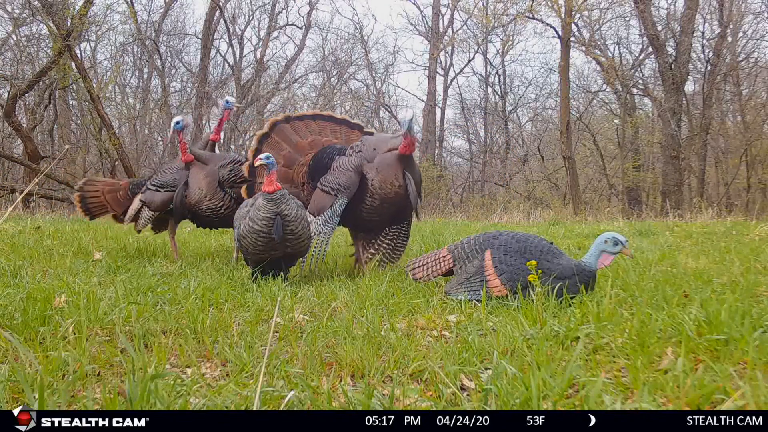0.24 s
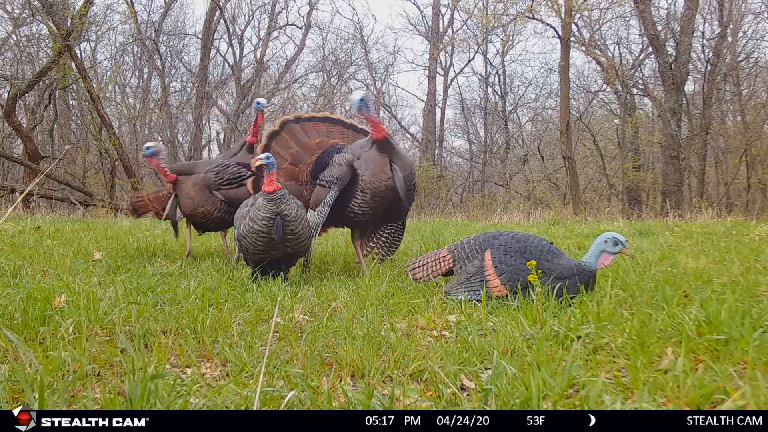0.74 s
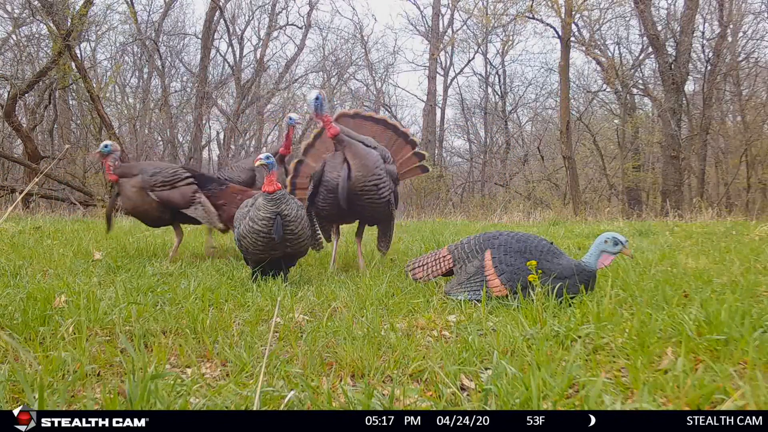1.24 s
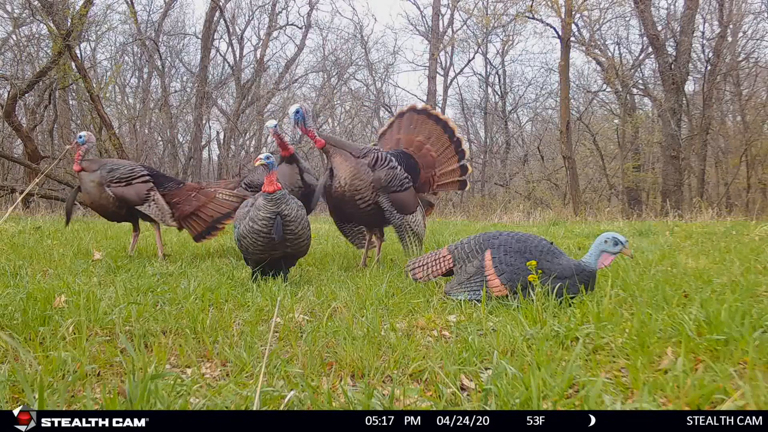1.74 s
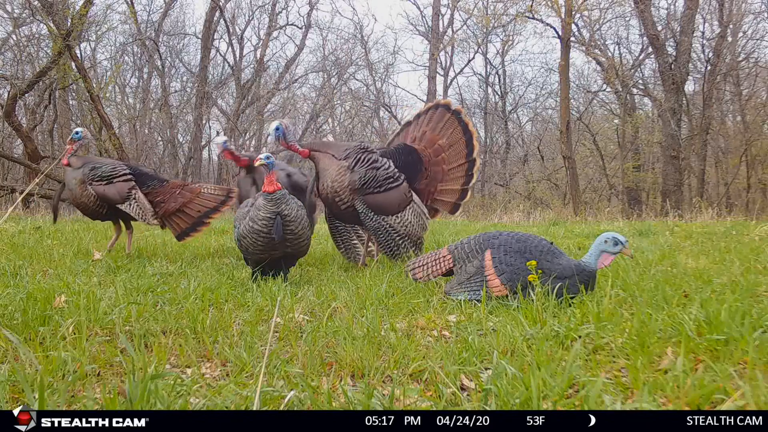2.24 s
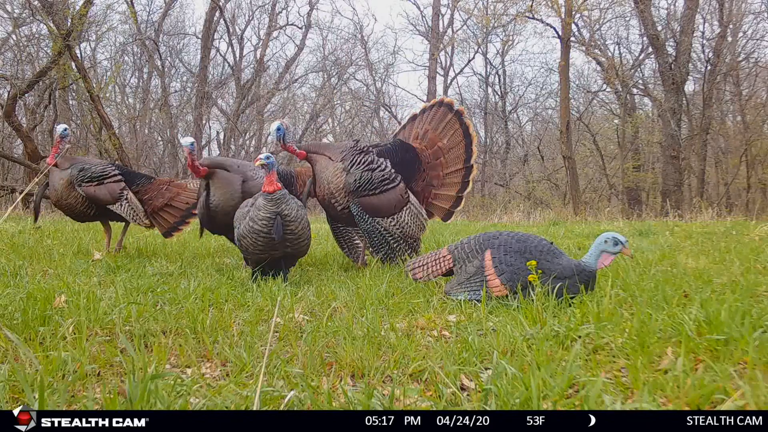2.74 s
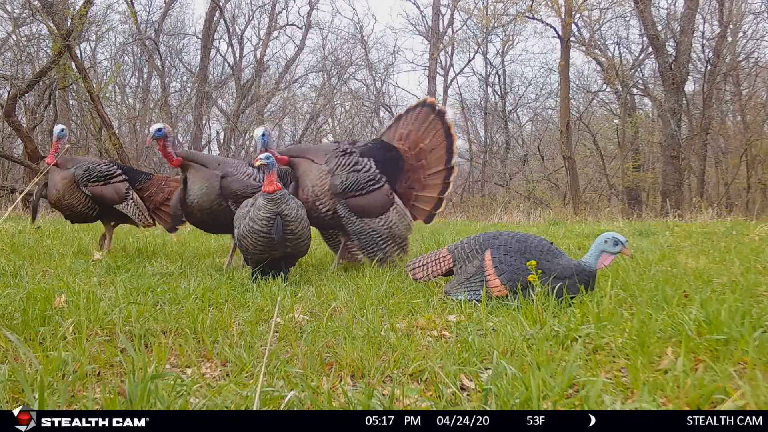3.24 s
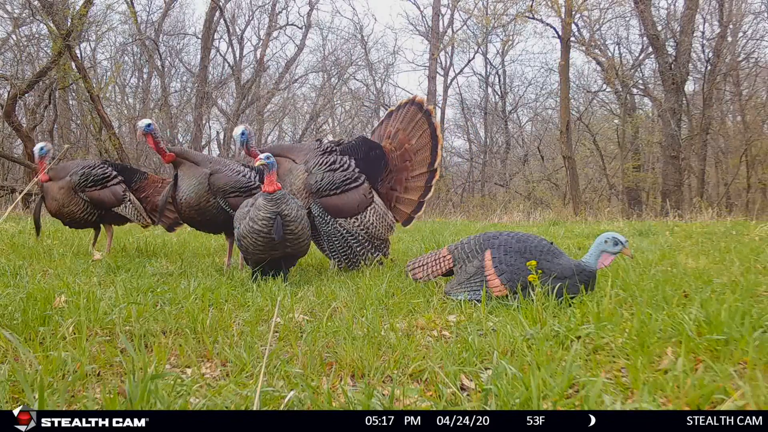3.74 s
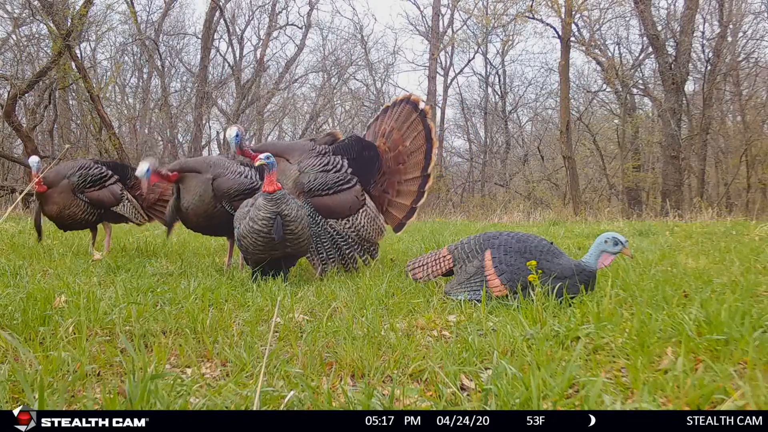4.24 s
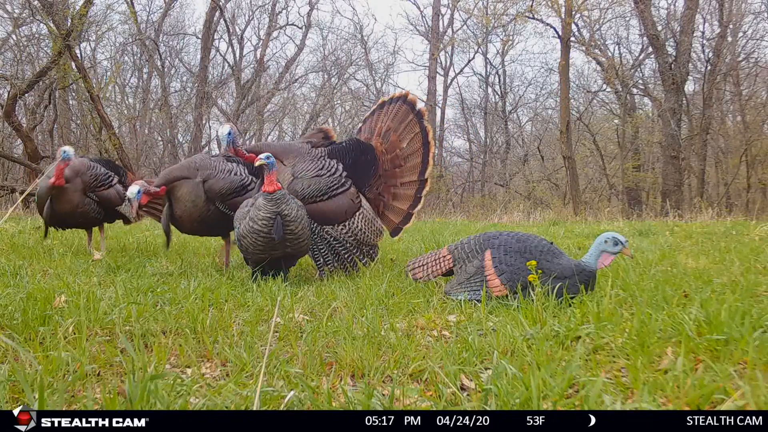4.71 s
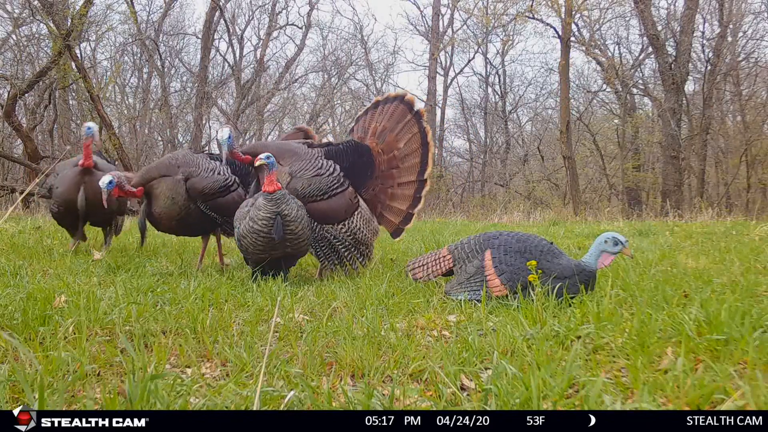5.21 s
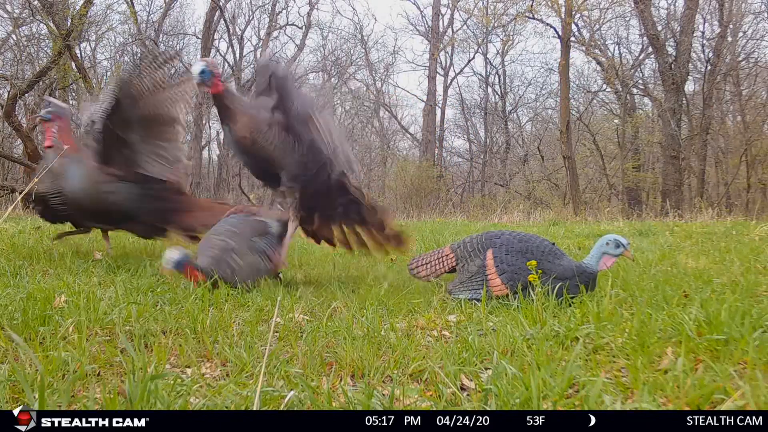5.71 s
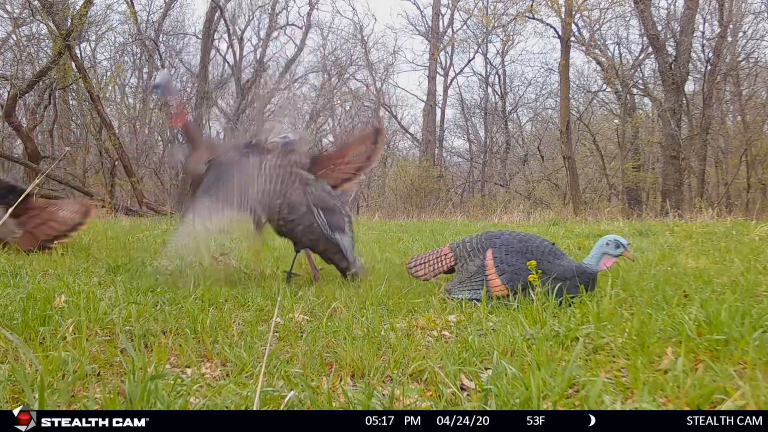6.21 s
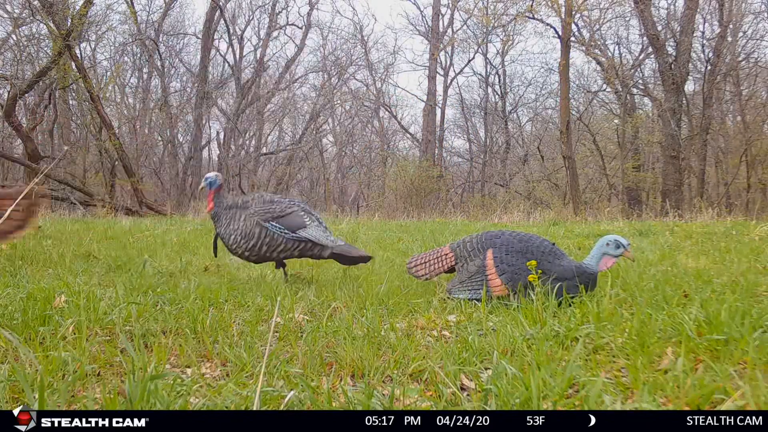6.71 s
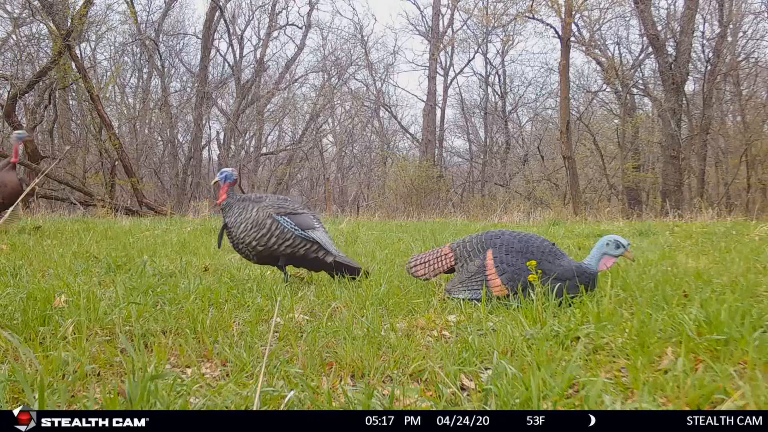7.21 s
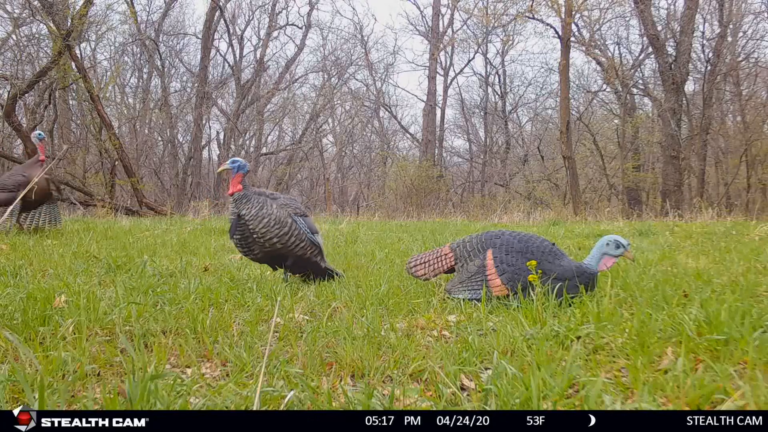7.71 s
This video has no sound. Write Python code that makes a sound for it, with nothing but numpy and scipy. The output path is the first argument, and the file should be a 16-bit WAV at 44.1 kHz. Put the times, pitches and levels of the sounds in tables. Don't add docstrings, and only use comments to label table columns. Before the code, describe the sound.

A turkey purrs in short rolling whistled notes over grass rustle, then a violent burst of wing slaps, cracking quills, hollow knocks and thumps overloads the microphone.

```python
import sys
import numpy as np
from scipy import signal
from scipy.fft import rfft, irfft, next_fast_len
from scipy.io import wavfile
from scipy.ndimage import uniform_filter1d, map_coordinates

SR = 44100
rng = np.random.default_rng(int(sys.argv[2]) if len(sys.argv) > 2 else 0)


def int16_out(signal):
    q = np.round(np.clip(np.atleast_2d(signal).T, -1, 1) * 32767)
    wavfile.write(sys.argv[1], SR, q.astype(np.int16))


def convert_level_to_amplitude(level_db):
    exponent = np.asarray(level_db, float) / 20
    return 10 ** exponent


N = 351036
SPAN = np.arange(-4096, 4096)
MS = SPAN / SR * 1000
TIME = np.arange(N) / SR


def unit(x):
    return x / np.sqrt(np.mean(x ** 2) + 1e-20)


def wobble(rate, size=N):
    knots = rng.standard_normal(int(size * rate / SR) + 4)
    return map_coordinates(knots, [np.arange(size) * rate / SR])


def filtered(x, response):
    m = next_fast_len(len(x) + 4096)
    hz = np.fft.rfftfreq(m, 1 / SR) + 1
    return irfft(rfft(x, m) * response(hz), m)[:len(x)]


def empty_track():
    return np.zeros(N + 2 * len(SPAN))


def add(track, s, piece):
    track[round(s * SR):][:len(SPAN)] += piece


def trimmed(track):
    return track[-SPAN[0]:][:N]


def crackle(size, spiky_db):
    jumps = np.repeat(rng.standard_normal(size // 16 + 1), 16)[:size]
    return rng.standard_normal(size) * convert_level_to_amplitude(spiky_db * jumps)


def rush(spectra, spiky_db, patchy_db):
    z = signal.stft(crackle(N, spiky_db), nperseg=256)[2]
    patches = uniform_filter1d(rng.standard_normal(z.shape), size=12, axis=0)
    patches = unit(uniform_filter1d(patches, size=6, axis=1))
    noise = signal.istft(z * convert_level_to_amplitude(patchy_db * patches), nperseg=256)[1][:N]

    def coloured(spectrum):
        point_hz, db = np.transpose(spectrum)
        return unit(filtered(noise, lambda hz: convert_level_to_amplitude(np.interp(np.log(hz), np.log(point_hz), db))))

    return [coloured(spectrum) for spectrum in spectra]


def bursts(rows, spiky_db):
    track = empty_track()
    for s, db, centre_hz, spread, rise, fall in rows:
        shape = convert_level_to_amplitude(db - 7.4 * np.where(MS < 0, -MS / abs(rise), MS / abs(fall)))
        bell = lambda hz: np.exp(-(np.log(hz / centre_hz) / spread) ** 2 / 4) / np.sqrt(hz)
        piece = filtered(shape * crackle(len(SPAN), spiky_db), bell)
        add(track, s, piece * np.linalg.norm(shape) / np.linalg.norm(piece))
    return trimmed(track)


# centre in Hz, width in Hz, level in dB.
THROAT = [
    (1180, 90, -12),
    (2100, 150, -32),
    (3450, 250, -35),
]


def whistles(notes, arch, reach, lag):
    track = empty_track()
    bend = (np.tanh((MS - lag) / reach) + np.tanh(lag / reach)) * reach
    broken = (1 + np.tanh(MS - lag - 1)) / 2
    for s, db, hz, glide, rise, fall, top_db in notes:
        shape = np.exp(-.9 * np.abs(MS / np.where(MS < 0, rise, fall)) ** np.where(MS < 0, 1.6, 2.8))
        break_dip_db = -5 * (lag > 0) * np.exp(-(MS - lag - .5) ** 2)
        shape *= convert_level_to_amplitude(top_db * broken + break_dip_db)
        pitch = hz + glide * bend - arch * (7 + abs(glide)) * bend ** 2
        pitch += 20 * wobble(250, size=len(SPAN))
        phase = 2 * np.pi * (np.cumsum(pitch) / SR + rng.random())
        tone = np.sin(phase)
        strain_db = .06 * abs(glide)
        for k in range(2, 7):
            throat = sum(convert_level_to_amplitude(g + strain_db) / (1 + ((k * pitch - c) / w) ** 2) for c, w, g in THROAT)
            tone += throat * shape * np.sin(k * phase)
        add(track, s, convert_level_to_amplitude(db) * shape * tone)
    return trimmed(track)


# start in seconds, end in seconds.
LEAP = (5.38, 6.6)


def wings():
    opening = (TIME - LEAP[0]) / 0.031
    folding = (LEAP[1] - TIME) / 0.071
    return np.clip(np.minimum(opening, folding), 0, 1)


# peak in seconds, rustle in dB, draught in dB, time to fall by 8 dB in ms.
SURGES = [(0.73, -63, -65, 400), (1.0, -65, -69.5, 300), (1.55, -65.5, -60, 300), (2.32, -64.5, -59, 250),
          (3.0, -64.5, -75, 450), (4.62, -84, -50, 350), (4.83, -67, -62, 200), (5.19, -62.5, -48, 148.5),
          (5.29, -70, -35.5, 86), (5.43, -37, -39, 50), (5.49, -25.5, -15.5, 57), (5.56, -28, -27.5, 92),
          (5.632, -27, -23, 41), (5.72, -39.5, -31.5, 91), (5.775, -37, -32.5, 92.5),
          (5.835, -35.5, -33, 80), (5.94, -42, -43, 152), (6.04, -40.5, -42, 79), (6.14, -34, -41, 69),
          (6.19, -32.5, -31, 61), (6.3, -31, -33, 104), (6.37, -30.5, -29, 39), (6.48, -42.5, -68, 47),
          (6.55, -49, -50, 260), (6.74, -46, -46.5, 135), (6.91, -50, -58, 98), (7.05, -55.5, -60, 300),
          (7.18, -51.5, -63, 120), (7.4, -60, -73, 400), (7.61, -51.5, -53.5, 398)]


def stir(column, calm_db, lasts):
    ms = np.arange(0, N + 64, 64) / SR * 1000
    table = np.transpose(SURGES)
    s, levels_db, fall = table[[0, column, 3], :, None]
    late = (ms - s * 1000) / (fall * lasts)
    drop_db = 8 * np.where(late < 0, -late / 0.61, late)
    power = convert_level_to_amplitude(calm_db) ** 2 + np.sum(convert_level_to_amplitude(levels_db - drop_db) ** 2, axis=0)
    return np.repeat(uniform_filter1d(10 * np.log10(power), size=5), 64)[:N]


def rustle_db():
    return stir(1, calm_db=-69, lasts=0.88)


# frequency in Hz, density in dB per Hz.
AIR = [(88, -17), (150, -2.5), (708, -11), (1090, -16.5), (1700, -16.5), (2060, -20), (4740, -24.5),
       (8320, -27), (15500, -28)]


def hush():
    return convert_level_to_amplitude(-57) * rush([AIR], spiky_db=1.5, patchy_db=0.16)[0]


# frequency in Hz, density in dB per Hz.
DRAUGHT = [(12, -22), (20, -0.5), (59, 0), (102, -3), (140, -5.5), (300, -18), (390, -24), (660, -120)]
WINGBEAT = [(20, -20), (90, 2.5), (230, -4.5), (330, -11), (600, -43)]
DRAG = [(150, -8.5), (250, -0.5), (725, -6.5), (1370, -13), (1800, -21), (2200, -39), (2860, -35),
        (4840, -120)]


def moving_air():
    wind, beat, drag = rush([DRAUGHT, WINGBEAT, DRAG], spiky_db=2.5, patchy_db=.7)
    share = wings()
    draught_db = stir(2, calm_db=-56, lasts=0.41) + 1.24 * wobble(4) + 3.0 * share * wobble(40)
    draught = convert_level_to_amplitude(draught_db) * (share * beat + (1 - share) * wind)
    drag_db = -46.5 + 1.15 * (rustle_db() + 40) + 3.8 * wobble(60)
    return draught + convert_level_to_amplitude(drag_db) * drag


# peak in seconds, level in dB, pitch in Hz, glide in Hz per ms, rise in ms.
OPENERS = [
    (0.126, -44, 700, -6, 9.4),
    (1.228, -38.5, 740, -15, 10.3),
    (2.154, -27.5, 700, -27.5, 4.6),
    (3.229, -39, 595, 4, 6.3),
    (3.3, -49, 750, 0.5, 4),
    (3.531, -48, 640, -2, 3.9),
    (4.388, -30.5, 756, -30, 7.5),
    (7.8375, -46.5, 799, 11.5, 10.6),
]
# peak in seconds, level in dB, pitch in Hz, glide in Hz per ms, rise and fall in ms.
HELD = (1.3052, -34, 720, -10, 9, 3.4)
# peak in seconds, level in dB, pitch in Hz, glide in Hz per ms, dB of the top after the voice breaks.
TRILLS = [(0.1874, -43, 800, 10, -8), (0.234, -38.5, 745, 54, -5), (0.284, -39, 800, 47, -5),
          (0.3292, -44, 799, 43.5, -4), (1.309, -45, 960, 8, -12), (1.352, -40, 760, 48, -10),
          (1.405, -49, 980, 80, -5), (2.2024, -34.5, 800, 53, -3), (2.2105, -53, 1300, 25, -14),
          (2.2567, -50, 1300, 25, -14), (2.3025, -50, 1290, 25, -14), (2.247, -36.5, 830, 46, 1),
          (2.294, -40, 830, 47, 0.5), (3.3124, -30.5, 720, 37, -2), (3.358, -34.5, 720, 56, -3),
          (3.4089, -44, 808, 40, -1), (3.4582, -45, 680, 23, -3), (3.5373, -44, 976, 24, -4),
          (3.579, -53, 953, 59, -7), (3.6192, -39, 950, 57, -12), (3.6628, -43.5, 990, 46, -11),
          (3.701, -54, 1050, 58.5, -6), (4.44, -34, 710, 51, -8), (4.49, -37.5, 830, 44, -10),
          (4.5344, -45, 833, 24.5, -6), (7.9326, -40, 843, 49, -4)]
# delay in ms, level in dB.
BOUNCES = [
    (1.6, -15.5),
    (6.5, -18),
]
# peak in seconds, level in dB, centre in Hz, half length in ms.
PUFFS = [
    (2.153, -59, 3450, 2.5),
    (2.2055, -60, 3400, 4),
    (2.207, -59, 2050, 2),
    (2.249, -62, 3450, 2),
]


def purr():
    falling = [(*row, row[-1] * 0.99, 0) for row in OPENERS] + [(*HELD, 0)]
    rising = [(s, db, hz, 1.7 * glide, 3.2, 6.9, top_db) for s, db, hz, glide, top_db in TRILLS]
    notes = whistles(falling, arch=0.094, reach=10, lag=0)
    notes = notes + whistles(rising, arch=0, reach=2.6, lag=1.8)
    echoes = lambda hz: 1 + sum(convert_level_to_amplitude(db) * np.exp(-2j * np.pi * hz * ms / 1000) for ms, db in BOUNCES)
    puffs = bursts([(s, db, hz, .07, ms, ms) for s, db, hz, ms in PUFFS], spiky_db=2)
    return filtered(notes * convert_level_to_amplitude(1.3 * wobble(300)), echoes) + puffs


# peak in seconds, level in dB, pitch in Hz, glide in Hz per ms, half length in ms.
SLURS = [
    (.24, -63, 7900, 12, 40),
    (3.43, -66, 2550, 9, 35),
    (3.6, -64.5, 2830, 8, 30),
    (3.79, -66.5, 2580, 4, 45),
    (3.885, -65.5, 2790, 1, 18),
    (3.91, -67.5, 2580, 4, 40),
]


def songbird():
    trunks = rng.standard_normal(SR // 10) * (rng.random(SR // 10) < .004)
    direct = SR // 40
    trunks[direct] = 3.5
    song = whistles([(*row, row[-1], 0) for row in SLURS], arch=0, reach=60, lag=0)
    return signal.fftconvolve(song, trunks / np.linalg.norm(trunks))[direct:][:N]


# frequency in Hz, density in dB per Hz.
RUSTLE = [(1060, -34), (1800, -11), (2170, -16), (2700, -11), (3700, -10.5), (5550, -3), (8240, -2),
          (11600, -5.5), (15500, -18.5)]
PLUMAGE = [(1060, -49), (1800, -11.5), (1990, -3.5), (2700, -2.5), (8240, -1), (12000, -6.5),
           (15500, -12.5)]


def rustle():
    grass, plumage = rush([RUSTLE, PLUMAGE], spiky_db=2.5, patchy_db=1.5)
    share = wings()
    level_db = rustle_db() + 1.63 * wobble(30) + 2.47 * share * wobble(90)
    return convert_level_to_amplitude(level_db) * (share * plumage + (1 - share) * grass)


# peak in seconds, level in dB, centre in Hz, length in ms.
TICKS = [(0.7546, -54, 7801, 5), (0.976, -53, 9000, 9), (1.113, -50.5, 11200, 20), (1.375, -55, 8287, 92),
         (1.758, -55.5, 7539, 11), (1.9118, -47, 7321, 1.9), (2.4948, -55, 7490, 6.4),
         (2.69, -57, 8188, 24), (2.9512, -52, 8255, 5), (3.163, -51, 8300, 36), (3.8289, -53, 6785, 2.2),
         (4.15, -42, 5860, 1.7), (4.2875, -47, 7240, 3.4), (4.731, -59.5, 7584, 21),
         (4.8445, -62, 7674, 25), (6.6753, -40, 7807, 5.5), (6.78, -53, 10000, 30), (6.83, -48, 10500, 15),
         (6.925, -47, 10000, 48), (7.13, -57, 9000, 11), (7.19, -51, 10500, 25), (7.715, -64, 8160, 35),
         (7.933, -55, 8500, 16)]


def grass_ticks():
    return bursts([(s, db, hz, .25, ms * 0.36, ms * 0.64) for s, db, hz, ms in TICKS], spiky_db=4.5)


# peak in seconds, level
# in dB, pitch in Hz, fall in ms.
THUMPS = [(1.332, -52, 70, 19), (2.177, -41.5, 61.3, 20), (4.422, -41, 62, 36), (4.689, -31, 135, 5.7),
          (4.705, -33, 60.3, 25), (4.768, -37.5, 33.2, 15), (5.237, -33.5, 69.5, 12), (5.27, -37, 96, 51),
          (5.333, -35, 28, 18), (5.4787, -1.5, 193, 3.5), (5.488, -16, 104, 10), (5.589, -19.5, 156, 5.4),
          (5.618, -14.5, 293, 1.4), (5.708, -21, 260, 2.4), (6.022, -21.5, 104, 25), (6.127, -25, 135, 5.1),
          (6.197, -22.5, 103, 4.9), (6.25, -30, 150, 4.3), (6.365, -29, 119, 15), (6.403, -31, 97, 10),
          (6.503, -24.5, 121, 10), (6.586, -33.5, 100, 6.4), (6.86, -44.5, 40, 60), (6.962, -38.5, 110, 11),
          (7.602, -46.5, 183, 12), (7.852, -40.5, 171, 5.6)]


def thumps():
    track = empty_track()
    for s, db, hz, fall in THUMPS:
        late = np.abs(MS / (fall + 3) / np.where(MS < 0, 0.61, 1))
        shape = convert_level_to_amplitude(db + 4.5 - 22 * late ** 1.36)
        sagging_ms = MS - .012 * MS * np.abs(MS)
        add(track, s, shape * np.sin(2 * np.pi * (hz * sagging_ms / 1000 + .25)))
    return trimmed(track)


# peak in seconds, level in dB, length in ms.
KNOCKS = [(2.4943, -46, 2.9), (5.455, -14, 2.2), (5.4782, -12, 12.2), (5.526, -16.5, 16),
          (5.5544, -21, 4.4), (5.5889, -15, 13.4), (5.618, -21.5, 10.5), (5.703, -27, 13.7),
          (5.7976, -21.5, 2.8), (5.814, -26.5, 12.5), (5.842, -30.5, 11), (5.9246, -35, 4),
          (6.127, -26.5, 19), (6.1679, -20.5, 2.1), (6.209, -30, 3), (6.219, -31, 4.2), (6.2506, -24, 3.7),
          (6.2663, -29, 2.7), (6.285, -23, 17), (6.302, -30, 11), (6.331, -31, 6), (6.351, -27, 7.9),
          (6.3686, -21.5, 4.1), (6.397, -28, 2.4), (6.4549, -35, 13), (6.497, -26, 2.8), (6.5824, -40, 2.6),
          (6.686, -48, 25), (7.1331, -49, 11), (7.179, -51, 19), (7.5053, -52, 4.3), (7.593, -47, 8),
          (7.61, -50, 60), (7.636, -47, 6), (7.85, -52, 60), (7.76, -50, 21), (7.953, -49, 8)]
# start in seconds, level in dB, pitch in Hz, time to fall 60 dB in seconds.
HOLLOW = (6.497, -39, 395, .42)


def decoy():
    s, db, hz, t60 = HOLLOW
    t = np.clip(TIME - s, 0, None)
    ring = convert_level_to_amplitude(db - 60 * t / t60) * np.sin(2 * np.pi * hz * t)
    knocks = [(s, db, 600, .58, ms * 0.33, ms * 0.67) for s, db, ms in KNOCKS]
    return ring + bursts(knocks, spiky_db=3.0)


# start in seconds, peak in dB, centre in Hz.
CRACKS = [(5.3905, -35, 7400), (5.398, -24, 7200), (5.4133, -24, 6500), (5.4196, -24, 3700),
          (5.4604, -8, 7400), (5.5035, -6, 7700), (5.528, -1, 5100), (5.5417, -11, 7300),
          (5.5686, -16, 7600), (5.5815, -13, 5900), (5.5945, -7, 7200), (5.6075, -7, 8800),
          (5.6211, -10, 6800), (5.686, -24, 6800), (5.6984, -19.5, 7000), (5.7033, -12, 9000),
          (5.7224, -25, 7400), (5.7316, -22, 6600), (5.793, -22, 7900), (5.7959, -18, 6900),
          (5.81, -12.5, 5600), (5.8435, -25, 6600), (5.8497, -23, 6600), (5.8896, -26, 5600),
          (5.9339, -27, 6200), (5.9905, -23, 8200), (6.0115, -25, 5800), (6.023, -23, 7100),
          (6.1017, -17, 7900), (6.1074, -17, 8200), (6.1241, -12, 7200), (6.1265, -8, 6800),
          (6.167, -15, 6600), (6.1832, -22, 5600), (6.1955, -22, 5200), (6.2099, -14, 4300),
          (6.2166, -14, 5300), (6.2505, -7, 8100), (6.2669, -13, 7600), (6.2719, -3, 6300),
          (6.2748, -6, 6400), (6.277, -2, 5900), (6.298, -8, 8300), (6.37, -18, 4700), (6.3946, -13, 5500),
          (6.3968, -15, 4700), (6.4334, -22, 10500), (6.4483, -23, 5700)]
# start in seconds, peak in dB, centre in Hz.
SHAFTS = [
    (5.4655, -7, 2900),
    (5.4783, -11, 7500),
    (5.8113, -9, 2700),
    (6.2487, -6, 3660),
    (6.3686, -6, 3300),
    (6.345, -22, 3800),
    (6.328, -22, 4500),
]


def cracks():
    track = empty_track()
    t = np.clip(MS + .1, 0, None) / 1000
    rows = [(*row, 1.07, 1) for row in CRACKS]
    rows += [(*row, 2.2, .3) for row in SHAFTS]
    for s, db, hz, cycles, scatter in rows:
        low, high = rng.random(2)
        ring = np.sin(2 * np.pi * hz * (.95 - .3 * scatter * low) * t)
        ring -= .8 * np.sin(2 * np.pi * hz * (1.25 + .5 * scatter * high) * t)
        add(track, s, convert_level_to_amplitude(db + 2.5) * np.exp(-t * hz / cycles) * ring)
    return trimmed(track)


# start in seconds, level in dB, centre in Hz, fall in ms.
SNAPS = [(5.3956, -35, 7960, 0.8), (5.4595, -19, 7040, 1.6), (5.466, -9, 2730, 2.5),
         (5.5032, -8.5, 7500, 3.1), (5.518, 0, 7900, 1.5), (5.528, -11, 5600, 4.4), (5.582, -18, 7000, 5.1),
         (5.5991, -6.5, 6111, 0.4), (5.7025, -20, 9000, 1.7), (5.763, -17, 8200, 0.82),
         (5.795, -24.5, 7200, 1.9), (5.8111, -12, 3570, 0.7), (5.813, -18, 9000, 1.5),
         (5.9268, -19, 8600, 0.43), (5.9892, -16, 9600, 0.5), (6.0005, -20, 7750, 0.94),
         (5.89, -35, 4500, 0.89), (6.012, -30, 4000, 1.5), (6.047, -38, 3200, 1.5), (6.101, -23, 7000, 3),
         (6.1657, -13, 5600, 1.2), (6.177, -15, 6170, 0.55), (6.21, -20.5, 4470, 2.3),
         (6.2485, -4, 4550, 0.54), (6.2657, -8, 6200, 1), (6.3684, -10, 5200, 0.6),
         (6.394, -22.5, 5800, 4.8), (6.449, -29, 6900, 4.6)]
# peak in seconds, level in dB, centre in Hz, half length in ms.
BRUSHES = [(5.3972, -22.5, 7400, 1.3), (5.419, -32, 4034, 2.7), (5.4678, -6, 5900, 3.3),
           (5.48, -17, 6360, 4.1), (5.5144, -4.5, 7400, 3.7), (5.541, -18.5, 7388, 5.9),
           (5.589, -15, 7814, 3.4), (5.5948, -16, 7341, 2.1), (5.6067, -18.5, 8112, 5.7),
           (5.856, -28.5, 9000, 5.2), (6.024, -31, 7550, 1.8), (6.115, -23.5, 7700, 12.3),
           (6.1268, -17, 6800, 3.1), (6.2165, -25.5, 5260, 3.5), (6.276, -12.5, 6600, 4.4),
           (6.295, -22.5, 8100, 21), (6.454, -27.5, 7100, 4.8)]


def slaps():
    width = lambda hz: 0.42 * np.minimum(5000 / hz, hz / 4500) ** 0.72
    rows = [(s, db, hz, width(hz), 0.15, ms) for s, db, hz, ms in SNAPS]
    rows += [(s, db, hz, width(hz), ms, ms) for s, db, hz, ms in BRUSHES]
    quill_band = lambda hz: 1 / (1 + (1500 / hz) ** 8) / (1 + (hz / 16000) ** 4)
    return filtered(bursts(rows, spiky_db=4.0) + cracks(), quill_band)


# time in seconds, pitch in Hz, level in dB.
WHINES = [
    [(7.022, 880, -62), (7.035, 880, -55), (7.08, 906, -52.5), (7.092, 880, -67)],
    [(7.15, 880, -62), (7.175, 900, -50), (7.194, 890, -64), (7.207, 866, -57), (7.225, 900, -52),
     (7.3, 812, -50), (7.33, 727, -64), (7.365, 540, -54)],
]


def whines():
    out = np.zeros(N)
    trill = 2 * np.pi * np.cumsum(40 + 4 * wobble(15)) / SR
    for rows in WHINES:
        s, pitch_hz, level_db = np.transpose(rows)
        hz = np.interp(TIME, s, pitch_hz)
        db = np.interp(TIME, s, level_db, -120, -120)
        gain = uniform_filter1d(convert_level_to_amplitude(db + 3 + 1.8 * np.cos(trill)), size=200)
        out += gain * np.sin(2 * np.pi * np.cumsum(hz + 46 * np.sin(trill)) / SR)
    return out


# centre in Hz, width in Hz, gain in dB.
PORT = [
    (2050, 280, -7),
    (8300, 380, 3),
]


def scene():
    port = lambda hz: convert_level_to_amplitude(sum(db / (1 + ((hz - c) / w) ** 2) for c, w, db in PORT))
    near = filtered(rustle() + grass_ticks() + slaps() + decoy(), port)
    mix = near + purr() + whines() + songbird() + thumps() + moving_air() + hush()
    return mix[None]


def roll_off(x):
    return signal.sosfilt(signal.butter(12, 15630, fs=SR, output="sos"), x)


def record(dry):
    mix = np.clip(dry, -.94, .94)
    return roll_off(mix)


dry = scene()
out = record(dry)
int16_out(out)
```